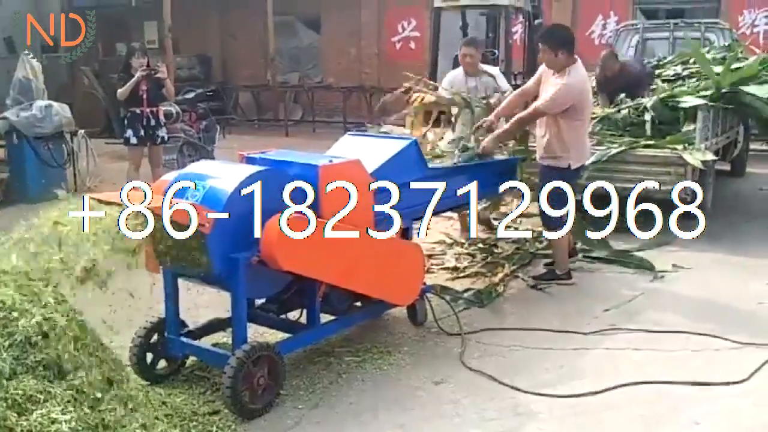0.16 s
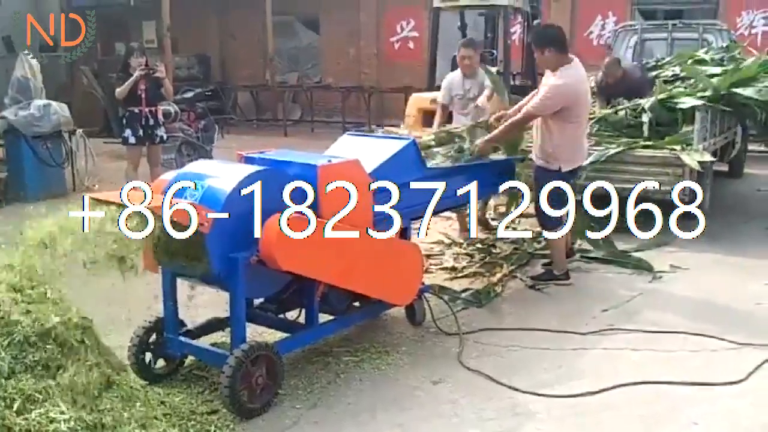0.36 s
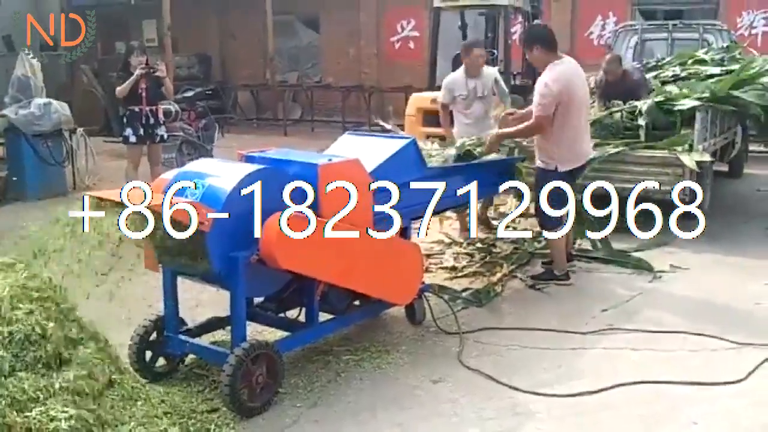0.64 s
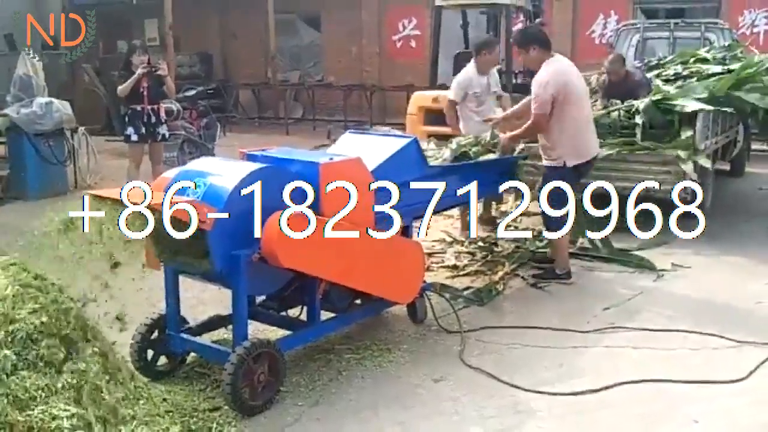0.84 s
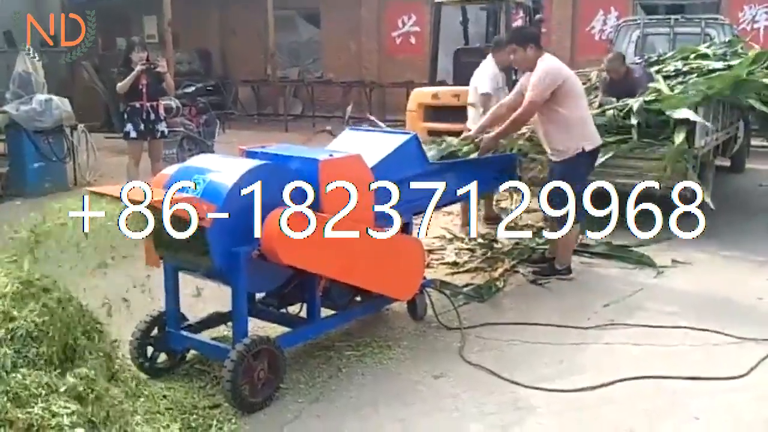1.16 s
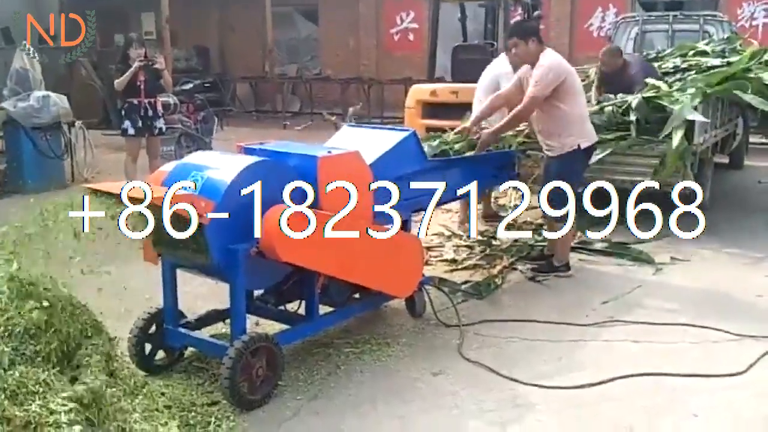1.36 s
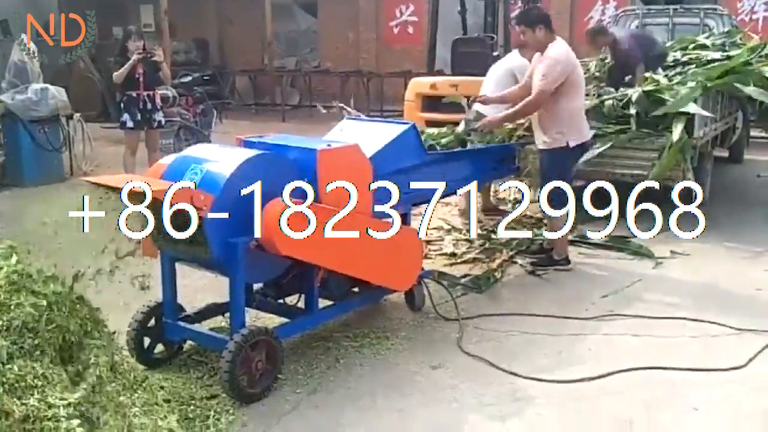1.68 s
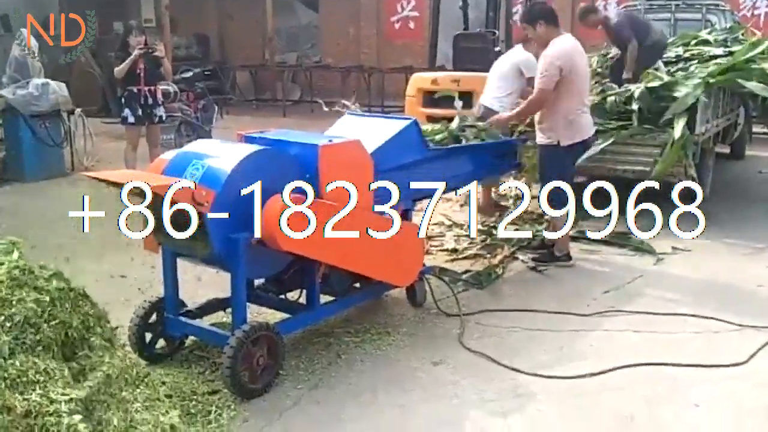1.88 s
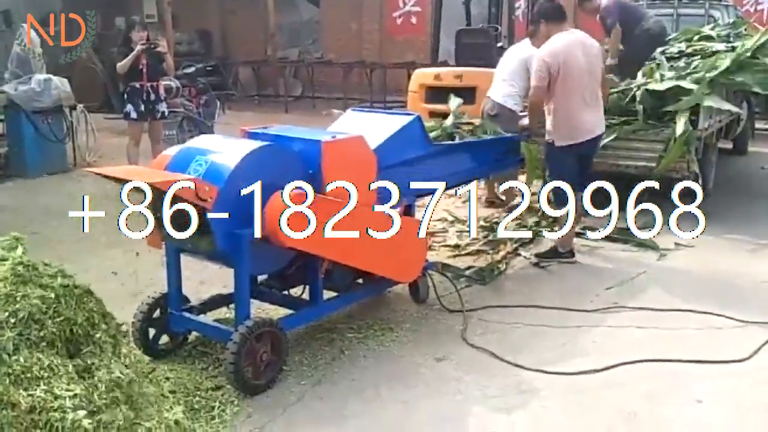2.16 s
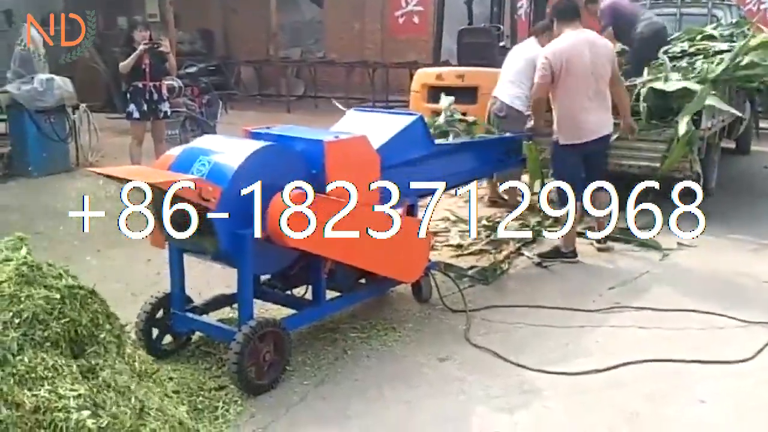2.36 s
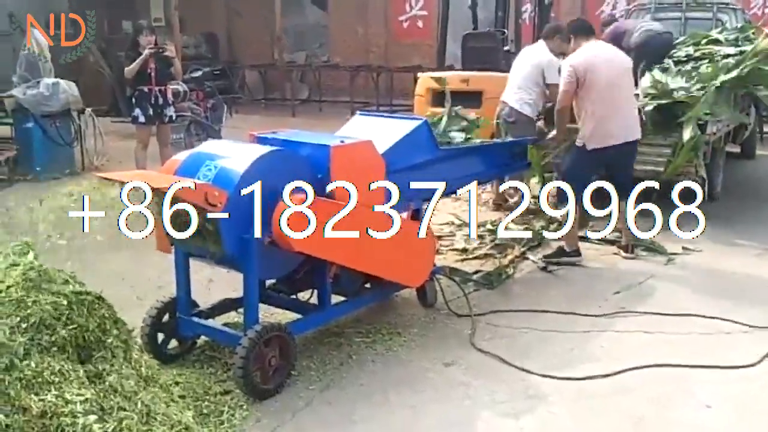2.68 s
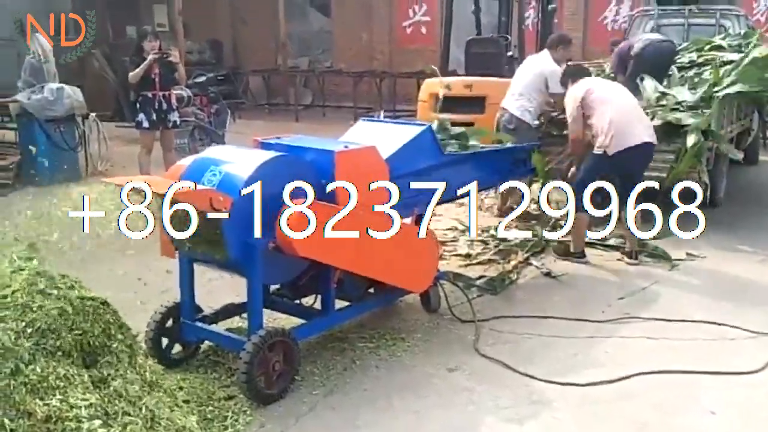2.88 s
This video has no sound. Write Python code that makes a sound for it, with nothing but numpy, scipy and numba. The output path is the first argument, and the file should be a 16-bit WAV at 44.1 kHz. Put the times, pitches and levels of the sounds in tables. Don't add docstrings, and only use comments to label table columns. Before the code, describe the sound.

Harsh, grainy shredding roar from a motor-driven stalk chopper, with low throbbing hum and tray thuds; one metal bang, a short wind gust on the right, then heavier chopping, captured outdoors by a stereo phone.

```python
import sys
import numpy as np
from scipy import signal
from scipy.io import wavfile
from scipy.ndimage import uniform_filter1d
from numba import njit

SR = 44100
rng = np.random.default_rng(int(sys.argv[2]) if len(sys.argv) > 2 else 0)


def put_to_file(sound):
    columns = np.atleast_2d(sound).T
    safe = np.clip(columns, -1, 1)
    whole_steps = np.round(safe * 32767)
    wavfile.write(sys.argv[1], SR, whole_steps.astype(np.int16))


def rack_gain(trim_db):
    fader = np.asarray(trim_db, float)
    return 10 ** (fader / 20)


N = 133182
TIME = np.arange(N) / SR
SIDES = np.array([[1], [-1]])


def col(table, k):
    a = np.array(table, float)
    return np.interp(TIME, a[:, 0], a[:, k])


def shade(table, hz):
    a = np.array(table, float)
    return np.interp(np.log(hz), np.log(a[:, 0]), a[:, 1])


def unit(x):
    return x / np.sqrt(np.mean(x ** 2))


def noise():
    return rng.standard_normal(N)


@njit
def svf(x, hz, width):
    y, b, l = np.empty(len(x)), 0., 0.
    g, k = np.tan(np.pi * hz / SR), width / hz
    for i in range(len(x)):
        v = (b + g * (x[i] - l)) / (1 + g * (g + k))
        b, l, y[i] = 2 * v - b, l + 2 * g * v, k * v
    return y


def band(x, hz, width):
    once = svf(x, 1. * hz, 1. * width)
    return svf(once, 1. * hz, 1. * width)


def walk(rate):
    k = int(SR / rate)
    steps = np.repeat(rng.standard_normal(N // k + 1), k)
    return unit(uniform_filter1d(uniform_filter1d(steps, k), k)[:N])


def modes(table, wander_db=0):
    out = 0
    for hz, width, db in table:
        out = out + rack_gain(db + wander_db * walk(14)) * unit(band(noise(), hz, width))
    return out


# t/s, drum turns f/Hz, shredding level/dB, left minus right level/dB
FEED_LINE = [(0.0, 41.64, -23, 3.5), (0.31, 40.78, -24, 3), (0.76, 41.3, -26, 2.5), (1.13, 41.23, -23.5, 4),
             (1.18, 41, -24.5, 2), (1.23, 41.36, -28.5, 0), (1.49, 41.06, -28, 1.5),
             (1.61, 41.39, -31, 2.5), (1.74, 41.4, -33, 4), (2.24, 41.52, -25, 4.0),
             (2.62, 41.21, -20.5, 5), (2.75, 40.9, -20, 0.5), (2.93, 40.76, -21, 1), (3.02, 40.27, -20, 2)]


def drum_turn():
    return 2 * np.pi * np.cumsum(col(FEED_LINE, 1)) / SR


def feed_load():
    return col(FEED_LINE, 2)


# t/s, level/dB
THIRD_THROB = [(0.0, -37), (0.03, -22.5), (0.34, -38), (0.83, -26.5), (1.07, -23.5), (1.2, -39),
               (1.56, -21), (1.62, -33.5), (1.72, -25), (1.89, -40), (1.93, -29.5), (2.56, -29),
               (2.63, -24), (2.78, -33.5), (2.98, -27.5), (3.02, -39.5)]
# multiple of the turn, level/dB
HUM_LINES = [(1, -46), (2, -34), (5, -37.5), (7, -40), (10, -43.5), (12, -44.5)]
# t/s, fourth multiple level/dB, hood ring level/dB, frame rumble level/dB
MACHINE_STRAIN = [
    (0, -34, -2.5, 0),
    (.3, -29, -5, 0.5),
    (1.05, -25.5, -2.5, 2),
    (1.3, -27.5, -7.5, 3),
    (1.7, -28.5, 2, 0),
    (2.05, -27, 0.5, -1.5),
    (2.5, -24, -1, -1),
    (3.02, -28.5, 0, 0.5),
]


def hum(turn):
    def tone(k):
        wobble = 0.8 * walk(11)
        return np.sin(k * turn + 2 * np.pi * rng.random() + wobble)

    beat_hz, beat_peak_s, beat_depth = 3.288, 1.049, 0.5
    beat = 1 + beat_depth * np.cos(2 * np.pi * beat_hz * (TIME - beat_peak_s))
    out = rack_gain(col(THIRD_THROB, 1) + 2.3 * walk(12)) * tone(3)
    out = out + rack_gain(col(MACHINE_STRAIN, 1) + 0.96 + 1.2 * walk(13)) * beat * tone(4)
    for k, db in HUM_LINES:
        out = out + rack_gain(db + 3.5 * walk(12)) * tone(k)
    return out


# f/Hz, level/dB per Hz
CHUTE_MIDDLE = [(500, -12), (900, -11), (1450, -8), (1900, -5.5), (2700, -7), (4550, -9), (4900, -10.5),
                (7400, -22)]


def knives(turn):
    spread_db, wander_db = -3, 1
    out = 0
    for k in range(8, 84, 2):
        db = shade(CHUTE_MIDDLE, k * FEED_LINE[0][1])
        db = db + spread_db * rng.standard_normal() + wander_db * walk(13)
        out = out + rack_gain(db) * np.sin(k * turn + 2 * np.pi * rng.random())
    return unit(out)


def grains(db):
    return rack_gain(db * np.repeat(rng.exponential(size=N // 64 + 1), 64)[:N])


# f/Hz, level/dB per Hz
CHUTE_DIFFERENCE = [(500, -12.5), (1000, -15.5), (1500, 0.5), (2300, -5), (3000, -4), (4500, -8),
                    (4900, -10), (7400, -22.5)]
# f/Hz, width/Hz, depth 0-1
PAVING_NOTCHES = [(1440, 260, .6), (4830, 260, .75)]


def chute_rush(turn):
    knife_puff, dull_db_per_db, flicker_db = 0.066, 0.13, 2.3
    load = feed_load()
    out = []
    for table, echo_share in ((CHUTE_MIDDLE, 1), (CHUTE_DIFFERENCE, 0.5)):
        chips = grains(0.9) * (1 + knife_puff * np.cos(2 * turn))
        rush = 0
        for hz in 520 * 2 ** np.arange(0, 3.9, 1 / 7):
            tilt_db = dull_db_per_db * np.log2(hz / 2500) * (load - load.mean())
            level = rack_gain(shade(table, hz) + tilt_db + flicker_db * walk(11))
            rush = rush + level * band(chips * noise(), hz, hz / 5)
        rush = unit(rush)
        for hz, width, depth in PAVING_NOTCHES:
            rush = rush - depth * echo_share * svf(rush, 1. * hz, 1. * width)
        out.append(rush)
    middle, difference = out
    return middle + SIDES * difference * rack_gain(-0.5)


# f/Hz, width/Hz, level/dB
HOOD_MODES = [(2320, 110, -12), (2450, 110, -13), (2830, 250, -18), (700, 200, -16), (1000, 120, -19)]


def hood_ring(bite):
    ring = modes(HOOD_MODES, 2.36) + 0.48 * SIDES * modes(HOOD_MODES, 2.36)
    left_right_db = 9
    ring = ring * rack_gain(SIDES * left_right_db / 2 + col(MACHINE_STRAIN, 2))
    return ring * (1 + rack_gain(-0.5) * np.tanh(bite))


# f/Hz, level/dB
GEAR_LINES = [(818, -20), (985, -7.5), (1067, -11.5), (2054, -19), (2335, -18), (2400, -18), (2452, -18),
              (2814, -21)]


def gears():
    out = 0
    for hz, db in GEAR_LINES:
        out = out + rack_gain(db + 5.5 * walk(4.76)) * np.sin(2 * np.pi * hz * TIME + 1.37 * walk(8))
    load = feed_load()
    return out * rack_gain(load - load.max() - 4)


def shredding(turn, bite):
    swell = rack_gain(0.4 * walk(7.3))
    cutting = (chute_rush(turn) + hood_ring(bite) + gears()) * swell + rack_gain(-16) * knives(turn)
    bite_rush = 0.6
    pan_db = col(FEED_LINE, 3) - 3
    return cutting * np.sqrt(1 + (bite_rush * bite) ** 2) * rack_gain(feed_load() + 0.5 + SIDES * pan_db / 2)


# f/Hz, level/dB per Hz
FRAME_RUMBLE = [(15, -45), (25, -17.5), (40, -15.5), (63, -11), (148, -0.5), (244, -7), (295, -1),
                (555, -10), (824, -4), (1500, -14.5), (1950, -47), (3300, -120)]


def body():
    pair = []
    for _ in range(2):
        rumble = 0
        for hz in 28 * 2 ** np.arange(0, 5.8, 1 / 3):
            level = rack_gain(shade(FRAME_RUMBLE, hz) + 1.8 * walk(8.29))
            rumble = rumble + level * band(noise(), hz, hz / 2.27)
        pair.append(unit(rumble))
    load = feed_load()
    level = rack_gain(-26 + col(MACHINE_STRAIN, 3) + 0.25 * (load - load.mean()))
    return np.array([pair[0], pair[1] * rack_gain(-7)]) * level


def knocks(table, trim_db, rise_s, fall_s):
    out = np.zeros(N)
    t = np.arange(-1800, 7000)
    shape = np.exp(np.where(t < 0, t / SR / rise_s, -t / SR / fall_s))
    for s, db in table:
        at = int((s + rise_s) * SR) + t
        ok = (at >= 0) & (at < N)
        out[at[ok]] += (rack_gain(db + trim_db) * shape[ok]) ** 2
    return np.sqrt(out)


# t/s, peak level/dB
TRAY_THUDS = [(0.076, -14.5), (0.175, -17.5), (0.243, -18.5), (0.309, -15.5), (0.467, -17.5), (0.65, -19),
              (0.734, -16.5), (0.833, -15), (0.897, -20), (1.074, -14.5), (1.165, -15.5), (1.249, -21.5),
              (1.311, -17), (1.495, -16), (1.856, -19.5), (1.993, -17), (2.327, -14), (2.42, -16),
              (2.525, -18.5), (2.59, -15), (2.672, -12.5), (2.767, -16), (2.826, -13), (2.958, -9.5)]
# f/Hz, width/Hz, level/dB
TRAY_MODES = [(708, 220, 1), (1004, 260, -1.5)]


def thuds():
    return unit(modes(TRAY_MODES)) * knocks(TRAY_THUDS, trim_db=-11.5, rise_s=0.01, fall_s=0.03)


# t/s, peak level/dB
KNIFE_BITES = [(0.0984, -9), (0.1612, -17), (0.2216, -6.5), (0.2937, -13.5), (0.3367, -19), (0.3726, -10.5),
               (0.426, -10), (0.566, -20), (0.6594, -11), (0.7083, -11), (0.8165, -14.5), (0.904, -10),
               (1.1199, -12), (1.1647, -4), (1.3128, -11.5), (1.4825, -21), (1.505, -14), (1.6365, -20),
               (1.6657, -24), (1.722, -22), (1.837, -22), (1.872, -16), (1.9854, -19), (2.0313, -10),
               (2.1031, -9), (2.1828, -11), (2.3266, -6), (2.3736, -8.5), (2.4493, -4), (2.7227, -6),
               (2.795, -14.5), (2.823, -5.5), (2.9462, -5.5), (2.9708, -12), (3.0006, -6.5)]


def bites():
    return knocks(KNIFE_BITES, trim_db=-12.5, rise_s=0.0045, fall_s=0.015) / rack_gain(feed_load())


# f/Hz, width/Hz, level/dB
STRUCK_HOOD = [(726, 300, -4), (1780, 370, -8), (2533, 140, -1.5), (3020, 450, -2.5), (3800, 2100, -10)]


def bang():
    peak_s, rise_s, fade_60db_s = 1.169, 0.012, 0.15
    t = TIME - peak_s
    shape = np.exp(np.where(t < 0, t / rise_s, -np.log(1000) * t / fade_60db_s))
    middle, difference = unit(modes(STRUCK_HOOD)), unit(modes(STRUCK_HOOD))
    return rack_gain(-16) * shape * (middle + 0.32 * difference * SIDES)


def duck():
    start_s, depth_db, fall_s, recover_s = 1.19, -6, 0.02, 0.15
    t = np.clip(TIME - start_s, 0, None)
    return rack_gain(depth_db * (1 - np.exp(-t / fall_s)) * np.exp(-t / recover_s))


# t/s, level/dB
GUST_LEVEL = [
    (1.28, -50),
    (1.36, -33),
    (1.46, -28),
    (1.55, -26),
    (1.65, -29),
    (1.76, -31),
    (1.86, -50),
]
# t/s, peak level/dB, pitch f/Hz, length/s
GUST_BUFFETS = [(1.35, -15, 130, .01), (1.40, -17, 100, .012), (1.42, -17, 250, .008),
                (1.445, -15, 130, .012), (1.48, -13, 130, .01), (1.505, -13, 220, .01),
                (1.55, -6, 105, .009), (1.582, -11, 120, .006), (1.598, -13, 200, .006),
                (1.645, -14, 90, .016), (1.70, -17, 95, .012), (1.79, -18, 100, .01)]


def gust():
    def rumble():
        low = unit(band(noise(), 95, 110))
        tail = rack_gain(-8) * unit(band(noise(), 322, 330))
        return rack_gain(2 * walk(22)) * (low + tail) * rack_gain(col(GUST_LEVEL, 1))

    puffs = 0
    for s, db, hz, length in GUST_BUFFETS:
        t = TIME - s
        puffs = puffs + rack_gain(db) * np.exp(-(t / length) ** 2) * np.cos(2 * np.pi * hz * t + np.pi)
    return np.array([rumble() * rack_gain(-22.5), rumble() + puffs])


def scene():
    turn = drum_turn()
    chop = shredding(turn, bites())
    rumble = body()
    low = hum(turn) * rack_gain(-0.3 * SIDES) + rumble[0] + SIDES * rumble[1]
    machine = chop + low * duck() + bang() + thuds()
    left_early = np.roll(machine[0], -2)
    return np.array([left_early, machine[1]]) + gust()


# f/Hz, level/dB
DETAIL_FLOOR = [(100, -12), (1000, -6), (1400, -1), (1900, -6), (4300, -4), (4800, 1), (6500, 1),
                (7400, 4.5)]


def lose_detail(x):
    hz, _, z = signal.stft(np.array([x[0] + x[1], x[0] - x[1]]) / 2, SR, nperseg=2048, noverlap=1536)
    bins, frames = z.shape[1:]
    hz_rows = hz[:, None]

    def blocks(rows):
        draws = rng.standard_normal((2, bins // rows + 1, frames // 3 + 1))
        return np.kron(draws, np.ones((rows, 3)))[:, :bins, :frames]

    power = np.abs(z) ** 2 + 1e-20
    near = uniform_filter1d(uniform_filter1d(power, size=12, axis=1), size=5, axis=2)
    usual = near.mean(axis=2, keepdims=True)
    follows, scatter_db = 0.8, 2.8
    floor_db = shade(DETAIL_FLOOR, hz + 1)[:, None] + scatter_db * blocks(rows=8)
    bar = near ** follows * usual ** (1 - follows) * rack_gain(floor_db) ** 2

    load = feed_load()
    thick = load[np.clip(np.arange(frames) * 512, 0, N - 1)] - load.mean()
    flutter_db, edge_hz = 5.5, 6000
    above_edge = np.clip(hz_rows / edge_hz - 1, 0, 1)
    edge_db = flutter_db * above_edge * 4 * (blocks(rows=bins)[0] - 0.08 * thick)
    keep = power > bar * rack_gain(edge_db) ** 2

    long_blocks = np.repeat(blocks(rows=9), 2, axis=2)[:, :, :frames][0]
    wide = near[1] > near[0] * rack_gain(-8 + 6 * long_blocks) ** 2
    keep[1] &= wide | (hz_rows > 1250)
    mid, side = signal.istft(z * keep, SR, nperseg=2048, noverlap=1536)[1][:, :N]
    return np.array([mid + side, mid - side])


def top_cut(x):
    return signal.sosfilt(signal.butter(12, 7430, fs=SR, output="sos"), x)


def record(dry):
    rounded = np.tanh(0.87 * dry) / 0.76
    mix = lose_detail(rounded)
    return top_cut(mix)


dry = scene()
out = record(dry)
put_to_file(out)
```